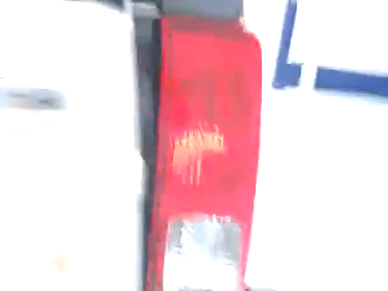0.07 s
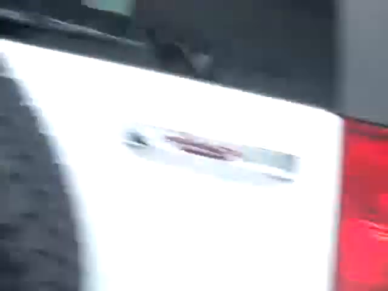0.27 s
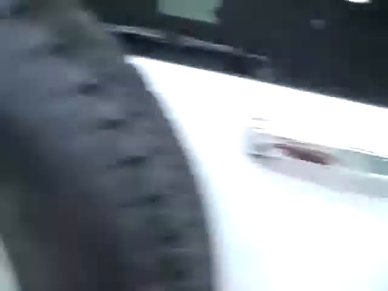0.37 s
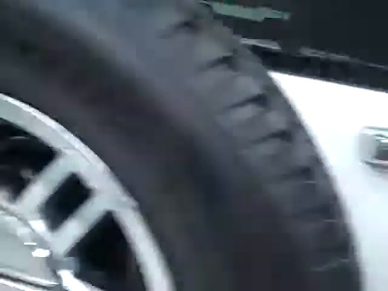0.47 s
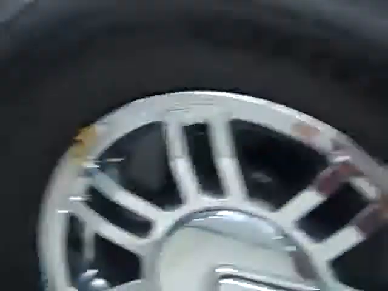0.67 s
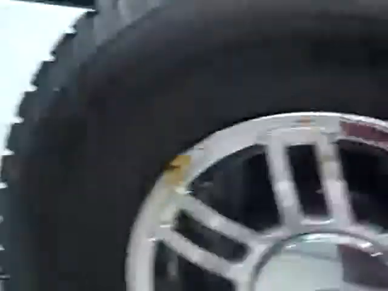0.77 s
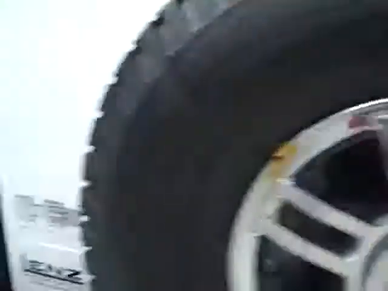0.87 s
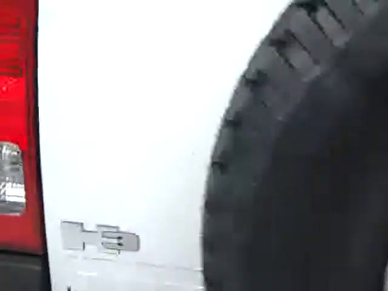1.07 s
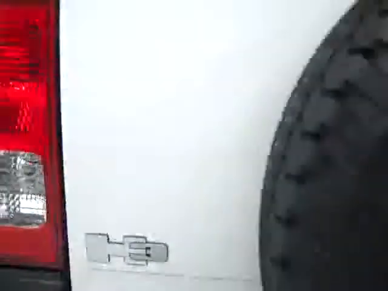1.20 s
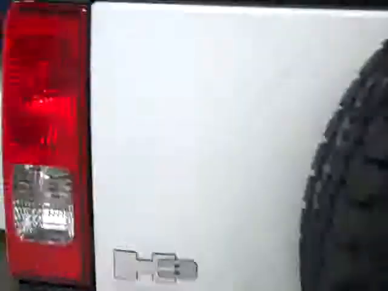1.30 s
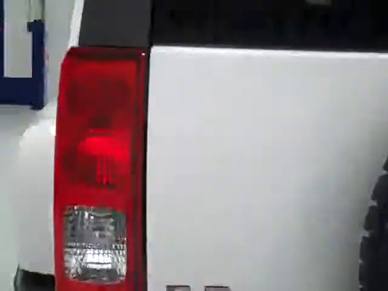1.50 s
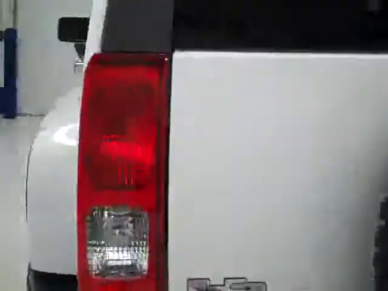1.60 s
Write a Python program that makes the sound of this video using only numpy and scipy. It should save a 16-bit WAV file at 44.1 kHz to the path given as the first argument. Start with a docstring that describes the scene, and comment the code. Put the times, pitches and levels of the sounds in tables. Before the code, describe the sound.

After a faint tick and a brief rush of air, a heavy car door bangs shut on an open lot, overloading the close microphone; low panel hum and echo die away, followed by a dry click and a small metal snap.

```python
"""A heavy rear door with a spare wheel on it is slammed on a car lot, close to the microphone.
Latch and panels strike in a quick run of blows: damped modes ring and shaped noise cracks.
Air pushed out is a swelling low noise, with a soft mid-pitched one; the lot's echo dies band by band.
Nearby ticks and scuffs are noise bursts, a case click and a metal snap are struck modes, over a faint lot.
The recorder overloads: its gain control ducks and recovers, and peaks are clipped and rounded."""
import sys
import numpy as np
from scipy import signal
from scipy.fft import rfft, irfft
from scipy.io import wavfile

SR = 44100
rng = np.random.default_rng(int(sys.argv[2]) if len(sys.argv) > 2 else 0)


def dump_mix(stems):
    """Bounce the given channels to the path in sys.argv[1] as a 16-bit WAV at rate SR."""
    frames = np.atleast_2d(stems).T  # one column per channel
    limited = np.clip(frames, -1, 1)  # hard clip at full scale
    pcm = np.round(limited * 32767).astype(np.int16)
    wavfile.write(sys.argv[1], SR, pcm)


N = 72765  # samples


def amp(db):
    """Decibel law: 20 dB is a tenfold amplitude."""
    return 10 ** (np.asarray(db) / 20)


def rms_one(x):
    """Normalisation to unit root-mean-square level."""
    return x / np.sqrt(np.mean(x ** 2) + 1e-20)


def at_hz(points, hz):
    """Interpolation along a logarithmic frequency axis."""
    points = np.array(points)
    return np.interp(np.log(hz), np.log(points[:, 0]), points[:, 1])


def pan(db):
    """Interaural level difference, shared equally: positive is louder on the left."""
    return amp([[db / 2], [-db / 2]])


def drift(rate_hz):
    """Low-passed random fluctuation of spread 1."""
    step = 40  # samples between computed values
    r = np.exp(-2 * np.pi * rate_hz * step / SR)
    white = rng.standard_normal(N // step + 2002)
    slow = rms_one(signal.lfilter([1], [1, -2 * r, r * r], white)[2000:])
    return np.interp(np.arange(N) / step, np.arange(len(slow)), slow)


def swell(peak_s, rise_s, t60_s):
    """Exponential growth (e-fold per rise_s) to the peak, then exponential decay (60 dB per t60_s)."""
    t = np.arange(N) / SR - peak_s
    rise = np.exp(np.minimum(t, 0) / rise_s)
    fall = amp(-60 * np.maximum(t, 0) / t60_s)
    return np.where(t < 0, rise, fall)


def correlate(mid, side, alike):
    """Mid-side mixing: two independent noises become a pair of given correlation."""
    alike = np.clip(alike, -1, 1)
    return np.sqrt(1 + alike) * mid + np.sqrt(1 - alike) * side * [[1], [-1]]


def pair(alike):
    """Partial coherence: two white noises with the given likeness."""
    mid, side = rng.standard_normal((2, N))
    return correlate(mid, side, alike) / np.sqrt(2)


def resonance(x, hz, width_hz):
    """Second-order resonance passed twice, weakened at both ends of the spectrum, at unit rms."""
    r = np.exp(-np.pi * width_hz / SR)
    section = [0.73, 0.011, -0.673, 1, -2 * r * np.cos(2 * np.pi * hz / SR), r * r]
    return rms_one(signal.sosfilt([section] * 2, x))


def strike(start_s, size, hz, t60_s):
    """Impulse response of one damped mode, excited by clicks of the given sizes."""
    clicks = np.full(N, 1e-18)
    clicks[(start_s * SR).astype(int)] = size
    q, w = amp(-60 / (t60_s * SR)), 2 * np.pi * hz / SR
    return signal.lfilter([0, np.sin(w)], [1, -2 * q * np.cos(w), q * q], clicks)


# blows as the door meets seal, latch and stops, then rebounds; direction is a signed strength
# columns: start_s [s], thud_db [dB], boom_db [dB], snap_db [dB], rattle_db [dB], direction [factor]
BLOWS = [(0.2416, -6.5, -20, -25, -33.5, -1.3), (0.2466, 1.5, -8, -3, -11.5, 0.9),
         (0.2535, 4.5, 5, -8, -21, -1.01), (.262, 3.5, 0.1, -2, -15, 0.79),
         (.273, 1.5, -3, -13, -10.5, 0.5), (.285, -10, -10, -12.5, -9, 0.92),
         (0.293, -2, -4, -10, -16.5, 0.96), (.304, -6, -8, -18, -12.5, -0.66),
         (.331, -3, -5, -31, -15.5, -0.85), (0.348, -12, -12, -28, -10.5, 0.83),
         (0.388, -7, -10, -45, -26.5, 0.64)]
# modes of door and body; columns: pitch_hz [Hz], level_db [dB], t60_s [s]
DOOR_MODES = [(37.4, -8.5, 0.53), (52.6, -7, 0.2), (70, -16.5, 0.28), (90.75, -2, 0.47), (144, -5.5, 0.27),
              (185, -3, 0.075), (233.1, -3, 0.35), (280.8, -6, 0.35), (421, -4, .14), (628, -7, .13),
              (679, -11, .13), (791.4, -5.5, 0.12), (979, -10, 0.094), (1327, -17, 0.11),
              (1860, -18, 0.099), (2396, -9, 0.038)]
# relative spectrum of the crack noise; columns: pitch_hz [Hz], level_db [dB per Hz]
CRACK_SPECTRUM = [(120, -19), (200, 5.5), (351, -6.5), (811, -6.5), (1210, -11), (1360, -14), (4460, -17.5),
                  (7110, -20), (9350, -22), (12200, -77.5), (20600, -120)]
BOOM_BELOW_HZ, CONTACT_HZ = 110, 1510  # modes below the first follow boom_db; low-pass of the contact
SNAP_T60_S, RATTLE_RISE_S, RATTLE_T60_S = 0.019, 0.0039, 0.099  # each crack is a snap and a longer rattle
CRACK_LIKENESS, DOOR_PAN_DB = 0.41, 8.5
PANELS_DB, PANELS_HZ, PANELS_WIDTH_HZ, PANELS_T60_S = -18, 765, 1100, 0.5


def door():
    """Modal excitation: blows through a soft contact ring the modes, with cracks and a panel buzz."""
    start_s, thud_db, boom_db, snap_db, rattle_db, direction = np.transpose(BLOWS)
    body = 0
    for hz, level_db, t60_s in DOOR_MODES:
        blow_db = boom_db if hz < BOOM_BELOW_HZ else thud_db
        uneven_db = rng.normal(0, 1.5, len(start_s))
        size = direction * amp(blow_db + level_db - 6 + uneven_db)
        body = body + strike(start_s, size, hz, t60_s)
    r = np.exp(-2 * np.pi * CONTACT_HZ / SR)
    body = signal.lfilter([1 - r], [1, -r], body)

    hz = np.fft.rfftfreq(N, 1 / SR) + 1  # 1 Hz up, to keep the logarithm finite
    noise = rms_one(irfft(rfft(pair(CRACK_LIKENESS)) * amp(at_hz(CRACK_SPECTRUM, hz)), N))
    envelope = 0
    for s, snap, rattle in zip(start_s, snap_db, rattle_db):
        envelope = envelope + amp(snap) * swell(s, 0.0022, SNAP_T60_S)
        envelope = envelope + amp(rattle) * swell(s, RATTLE_RISE_S, RATTLE_T60_S)

    # trim and panels buzz on as dull noise from the fourth blow
    buzz = resonance(pair(0.84), PANELS_HZ, PANELS_WIDTH_HZ) * amp(PANELS_DB + 4.1 * drift(30))
    buzz = buzz * swell(start_s[3], 0.0035, PANELS_T60_S)
    return (body + noise * envelope + buzz) * pan(DOOR_PAN_DB)


PUSH_DB, PUSH_RISE_DB_PER_S, PUSH_HZ = -28, 302, 269  # air squeezed out of the closing gap
# a soft mid-pitched noise swells just before the first blow
MID_RUSH_DB, MID_RUSH_HZ, MID_RUSH_RISE_S = -26.5, 546, 0.012


def push():
    """Flow noise: a dull low rush and a soft mid-pitched one swell until the first blow."""
    shut_s = BLOWS[0][0]
    low_band = signal.butter(2, [30, PUSH_HZ], "band", fs=SR, output="sos")
    rush = amp(PUSH_DB) * rms_one(signal.sosfilt(low_band, pair(0.9)))
    rise_s = 20 / np.log(10) / PUSH_RISE_DB_PER_S
    rush = rush * swell(shut_s, rise_s, 0.028)
    mid_rush = amp(MID_RUSH_DB) * resonance(pair(0.35), MID_RUSH_HZ, 2 * MID_RUSH_HZ)
    mid_rush = mid_rush * swell(shut_s, MID_RUSH_RISE_S, 0.063)
    return (rush + mid_rush) * pan(DOOR_PAN_DB)


# left-right correlation of diffuse noise; columns: pitch_hz [Hz], likeness [-1 to 1]
LIKENESS = [(60, 0.56), (160, 0.96), (440, 0.8), (1200, 0.33), (3270, 0.19), (8900, 0.27)]
# level of left over right; columns: pitch_hz [Hz], level_db [dB]
LEFT_LOUDER = [(60, 8), (160, 9.5), (440, 7), (1200, 5.5), (3270, 8), (8900, 1)]


def bands(spectrum, patchy_db):
    """Third-octave analysis in reverse: stereo noise as (Hz, band), whose mono sum has rms 1."""
    edges = 22 * 2 ** np.arange(0, 9.1, 1 / 3)
    together = drift(8)
    white = rng.standard_normal((2, 2, N + SR // 4))
    out = []
    for k, (low, high) in enumerate(zip(edges, edges[1:])):
        band_pass = signal.butter(2, [low, high], "band", fs=SR, output="sos")
        # neighbouring bands use independent noise; the filter's onset is dropped
        mid, side = signal.sosfilt(band_pass, white[k % 2])[:, -N:]
        hz = np.sqrt(low * high)
        both = correlate(mid, side, at_hz(LIKENESS, hz)) * pan(at_hz(LEFT_LOUDER, hz))
        level_db = at_hz(spectrum, hz) + patchy_db * (together + drift(3.7))
        out.append((hz, both * amp(level_db)))
    mono = sum(band for _, band in out).mean(axis=0)
    scale = np.sqrt(np.mean(mono ** 2))
    return [(hz, band / scale) for hz, band in out]


# relative spectrum of the echo at its middle time; columns: pitch_hz [Hz], level_db [dB per Hz]
ECHO_SPECTRUM = [(15, -17.5), (25, -20), (95, -12.5), (177, -9), (233, -7), (346, -14), (887, -22),
                 (980, -23.5), (1570, -24), (1910, -21), (5700, -24), (8060, -26.5), (9350, -36),
                 (12200, -95.5), (20600, -120)]
# reverberation time of the lot; columns: pitch_hz [Hz], t60_s [s]
ECHO_T60 = [(30, 1.9), (90, 0.74), (230, 1.54), (600, 1.79), (2000, 2.62), (5000, 3.33), (9000, 3.8)]
# panels and cabin that hum on after the slam, swelling and dying
# columns: pitch_hz [Hz], level_db at the peak, before wavering and panning [dB], peak_s [s], rise_s [s], t60_s [s]
BOOMS = [(92, -28, .49, .15, 1.1), (106, -30, .55, .06, 1.8), (227, -31, .7, .12, 1.3),
         (237.5, -31, .7, .12, 1.7), (155, -36, .72, .1, 1.2), (292, -36, .52, .1, 1.5)]
ECHO_DB, ECHO_MID_S, ECHO_BUILD_S = -33.5, 0.87, 0.015  # the noise has this level at the middle time
BOOM_WAVER_HZ = 0.6


def echo():
    """Reverberant decay: reflections merge into noise dying band by band, with a few booming pitches."""
    t = np.arange(N) / SR
    out = 0
    for hz, band in bands(ECHO_SPECTRUM, patchy_db=0.0):
        decay = amp(-60 * (t - ECHO_MID_S) / at_hz(ECHO_T60, hz))
        out = out + amp(ECHO_DB) * band * decay
    for hz, level_db, peak_s, rise_s, t60_s in BOOMS:
        phase = 2 * np.pi * np.cumsum(hz + BOOM_WAVER_HZ * drift(6.0)) / SR
        tone = np.sin(phase - phase[int(peak_s * SR)])
        tone = tone * amp(level_db + 0.86 * drift(3.2)) * swell(peak_s, rise_s, t60_s)
        out = out + tone * pan(at_hz(LEFT_LOUDER, hz))
    # the echo grows from the second blow on
    build = 1 - np.exp(-np.maximum(t - BLOWS[1][0], 0) / ECHO_BUILD_S)
    return out * build


# small ticks and scuffs; width_hz is that of one of the two filter passes
# columns: peak_s [s], level_db [dB], pitch_hz [Hz], width_hz [Hz], rise_s [s], t60_s [s], side_db [dB]
TICKS = [(0.1252, -29.5, 6300, 2500, 0.0003, 0.013, 3.5), (0.134, -39, 7100, 4200, 0.019, 0.057, 15),
         (0.213, -44.5, 6200, 5000, 0.0066, 0.2, 7), (0.856, -29.5, 5500, 6100, 0.00063, 0.029, 9),
         (1.091, -39, 7830, 2500, 0.032, 0.24, 11.5), (1.199, -43, 7440, 2540, 0.048, 0.28, 10),
         (1.2, -42, 2750, 4000, 0.063, 0.33, 7.5), (1.516, -30, 3700, 1700, 0.003, 0.03, 6),
         (0.287, -12.5, 2450, 500, 0.0022, .03, 12), (0.303, -15.5, 6900, 2500, 0.0033, 0.07, 14),
         (1.519, -43, 7400, 3970, .003, 0.14, 10.5), (1.531, -44.5, 3330, 2490, .01, 0.97, 6.5),
         (1.528, -44.5, 1350, 1190, 0.023, 0.52, 7), (1.64, -45, 7000, 2500, 0.03, .1, 9)]


def ticks():
    """Filtered noise bursts: each is confined to one broad resonance."""
    out = 0
    for peak_s, level_db, hz, width_hz, rise_s, t60_s, side_db in TICKS:
        burst = amp(level_db) * resonance(pair(0.75), hz, width_hz)
        out = out + burst * swell(peak_s, rise_s, t60_s) * pan(side_db)
    return out


def taps(hits, modes, side_db):
    """Modal ringing of small parts: hits vary a little from mode to mode, and the bass is filtered out."""
    start_s, hit_db = np.transpose(hits)
    rung = 0
    for hz, level_db, t60_s in modes:
        uneven_db = rng.normal(0, 1, len(start_s))
        rung = rung + strike(start_s, amp(hit_db + level_db + uneven_db), hz, t60_s)
    high_pass = signal.butter(2, 1000, "high", fs=SR, output="sos")
    return signal.sosfilt(high_pass, rung) * pan(side_db)


# a dry click with two bounces; columns: start_s [s], level_db [dB]
CLICKS = [(.8538, -12), (.8565, -25), (.8579, -24)]
# modes of the recorder's case; columns: pitch_hz [Hz], level_db [dB], t60_s [s]
CASE_MODES = [(2200, -10, .003), (3800, -4, .003), (5900, 0.1, .003)]


def case_click():
    """Heavily damped modes: a dry click, as of a finger on the recorder's case."""
    return taps(CLICKS, CASE_MODES, side_db=3.5)


# blows of a small metal part; columns: start_s [s], level_db [dB]
SNAPS = [(1.5125, -38), (1.5157, -24), (1.5187, -29), (1.523, -38)]
# modes of that part; columns: pitch_hz [Hz], level_db [dB], t60_s [s]
CATCH_MODES = [(1430, -7.5, 0.046), (1830, -4, .03), (3040, -6.5, 0.032), (3370, -1.8, 0.041),
               (3670, -2, 0.02), (3920, -13, 0.065), (4380, -18.5, 0.0095)]


def metal_snap():
    """Lightly damped modes: a small metal part snaps home nearby."""
    return taps(SNAPS, CATCH_MODES, side_db=8.0)


# relative spectrum of distant traffic and air; columns: pitch_hz [Hz], level_db [dB per Hz]
LOT_SPECTRUM = [(15, -47), (25, -2.5), (277, -17), (329, -20.5), (490, -21.5), (746, -27), (804, -22.5),
                (866, -23), (1170, -26), (7300, -32), (9350, -24.5), (12200, -90.5), (20600, -120)]
LOT_DB = -44


def lot():
    """Diffuse background field: distant traffic and air as slightly uneven noise."""
    return amp(LOT_DB) * sum(band for _, band in bands(LOT_SPECTRUM, patchy_db=0.5))


def scene():
    """Superposition of the sources, from the door to the background."""
    return door() + push() + echo() + ticks() + case_click() + metal_snap() + lot()


DUCK_ABOVE_DB, DUCK_ATTACK_S, DUCK_RELEASE_DB_PER_S = -2, 0.02, 42.5
LEFT_STOP_HZ, RIGHT_STOP_HZ, TOP_STOP_HZ = 9450, 8600, 16000  # stop-band edges
LEFT_LAG_SAMPLES, OVERLOAD_HARDNESS = 2, 6.7


def record(dry):
    """Gain control and saturation: gain ducks and climbs back, peaks are clipped and rounded, treble is cut."""
    peak_db = 20 * np.log10(np.abs(dry).max(axis=0) + 1e-9)
    over_db = np.maximum(peak_db - DUCK_ABOVE_DB, 0)
    ramp_db = DUCK_RELEASE_DB_PER_S * np.arange(N) / SR
    held_db = np.maximum.accumulate(over_db + ramp_db) - ramp_db  # peak hold with a steady release
    r = np.exp(-1 / (DUCK_ATTACK_S * SR))
    duck_db = signal.lfilter([1 - r], [1, -r], held_db)
    clipped = np.clip(dry * amp(-duck_db), -0.95, 0.95)  # the slow attack lets the first peaks through

    left = signal.sosfilt(signal.cheby2(20, 60, LEFT_STOP_HZ, fs=SR, output="sos"), clipped[0])
    right = signal.sosfilt(signal.cheby2(20, 60, RIGHT_STOP_HZ, fs=SR, output="sos"), clipped[1])
    both = np.array([np.roll(left, LEFT_LAG_SAMPLES), right])
    rounded = both / (1 + np.abs(both) ** OVERLOAD_HARDNESS) ** (1 / OVERLOAD_HARDNESS)
    return signal.sosfilt(signal.cheby2(8, 40, TOP_STOP_HZ, fs=SR, output="sos"), rounded)


dry = scene()
out = record(dry)
dump_mix(out)
```